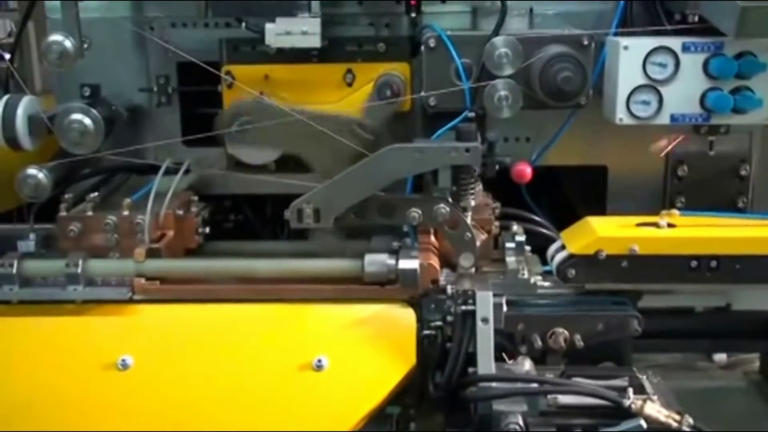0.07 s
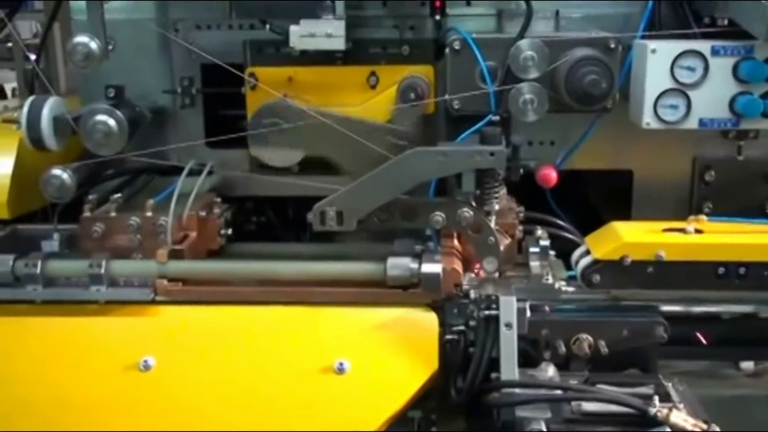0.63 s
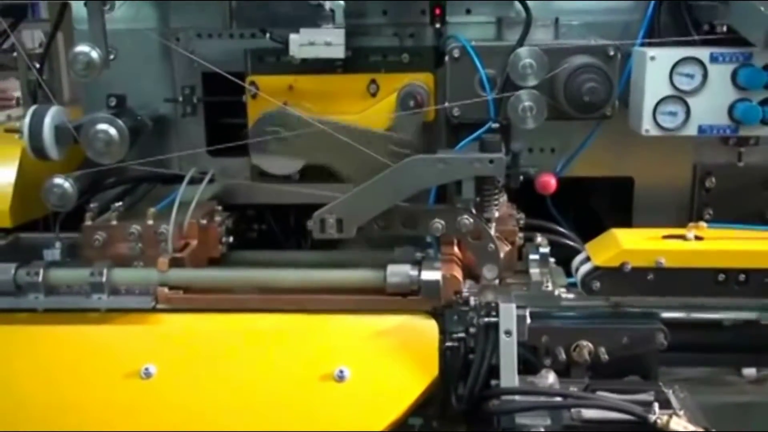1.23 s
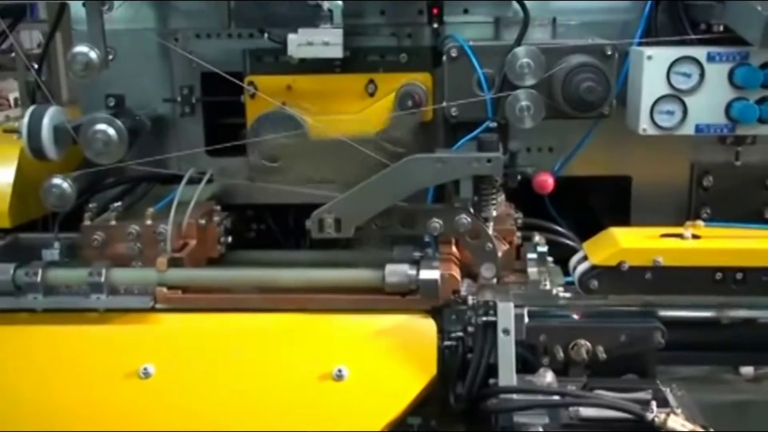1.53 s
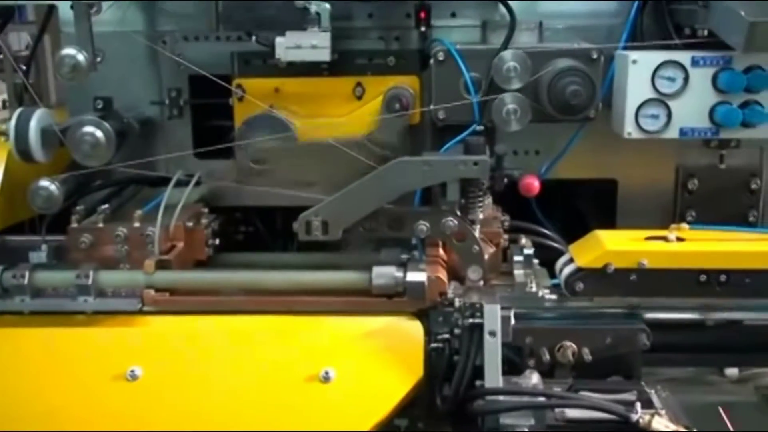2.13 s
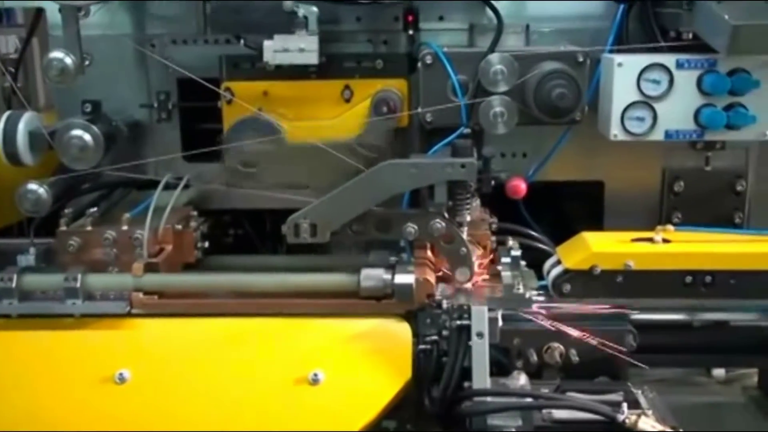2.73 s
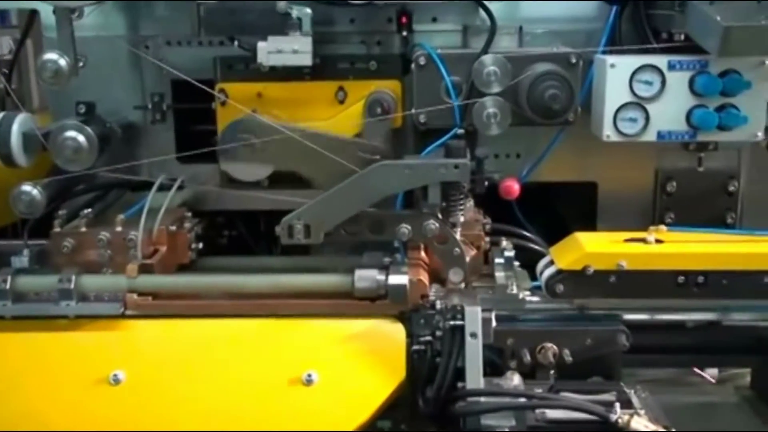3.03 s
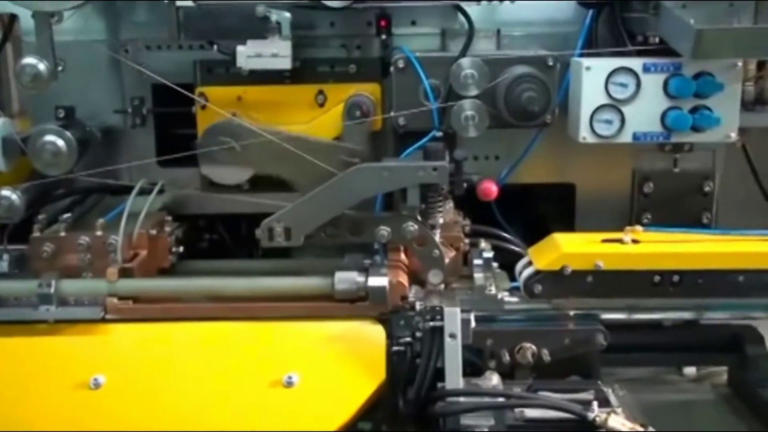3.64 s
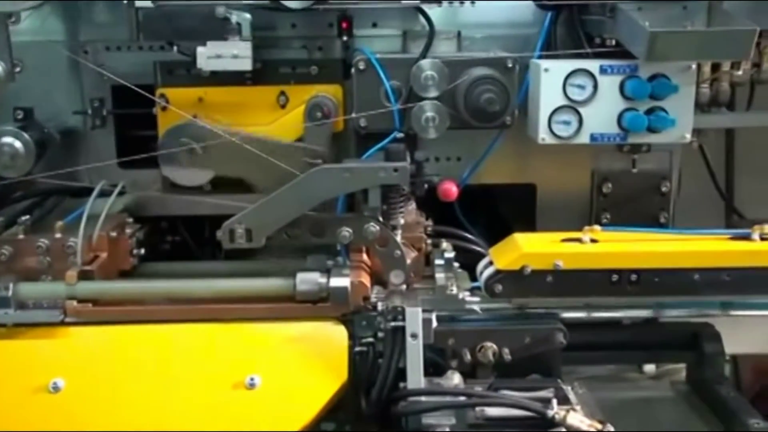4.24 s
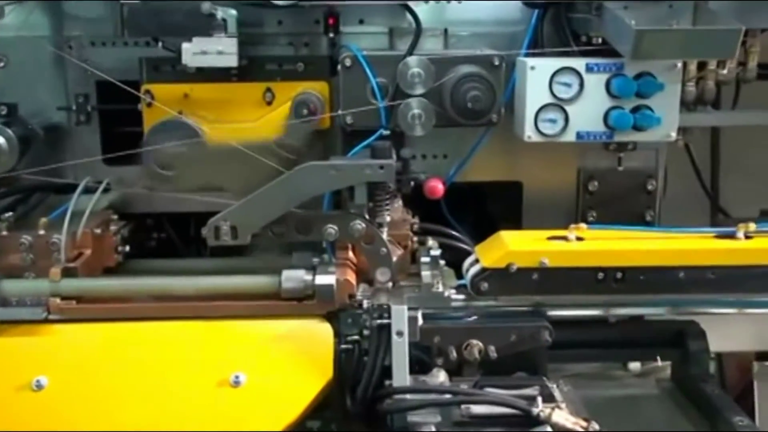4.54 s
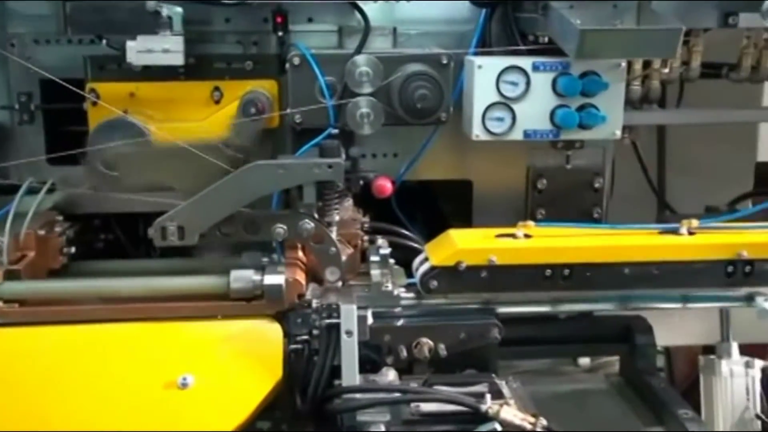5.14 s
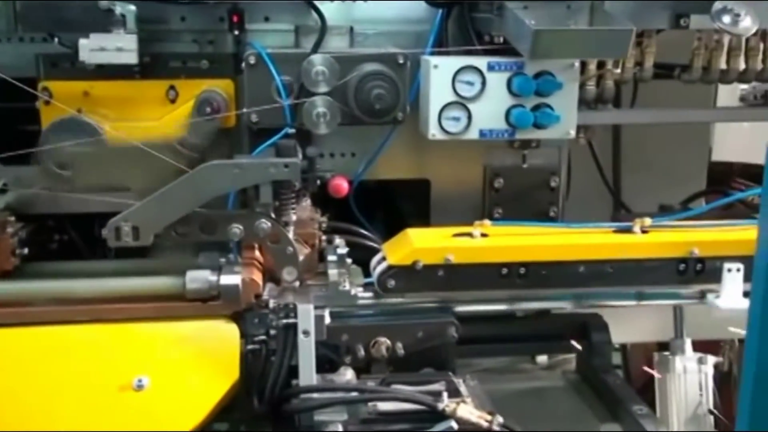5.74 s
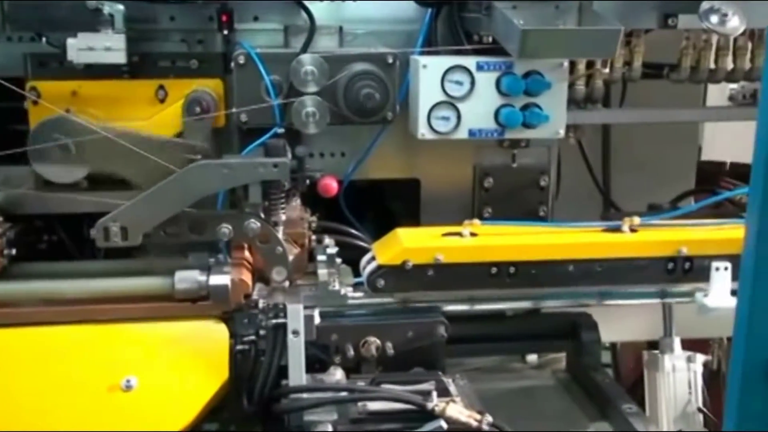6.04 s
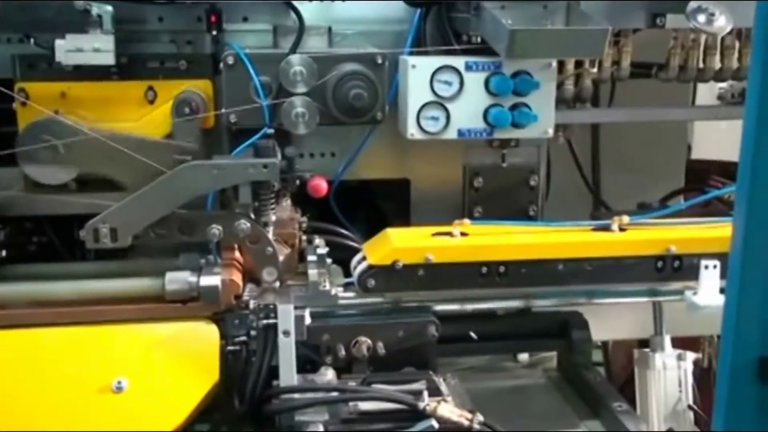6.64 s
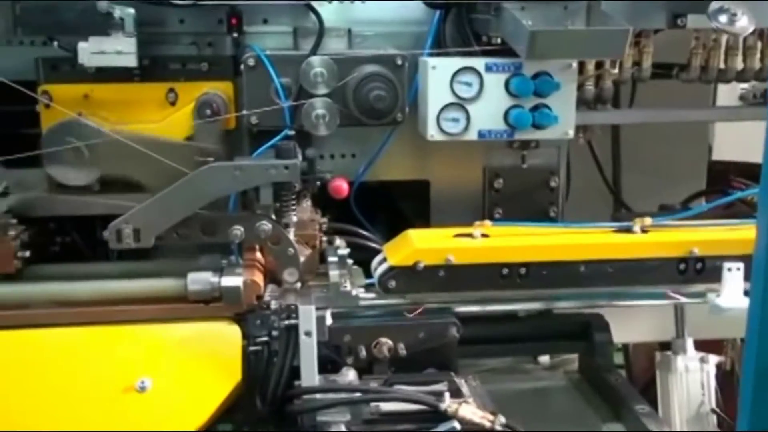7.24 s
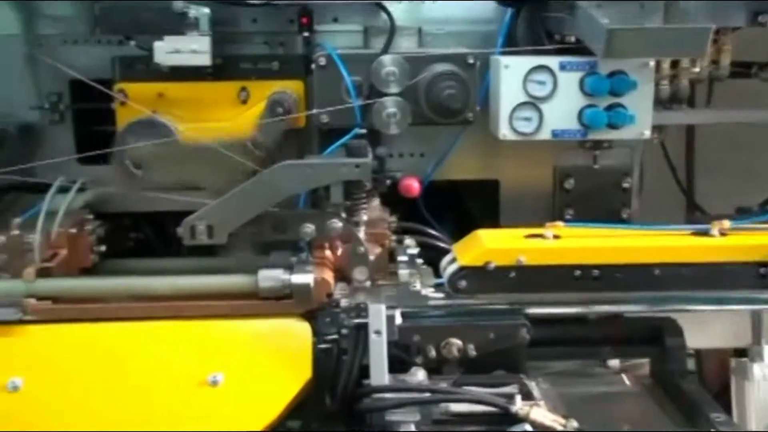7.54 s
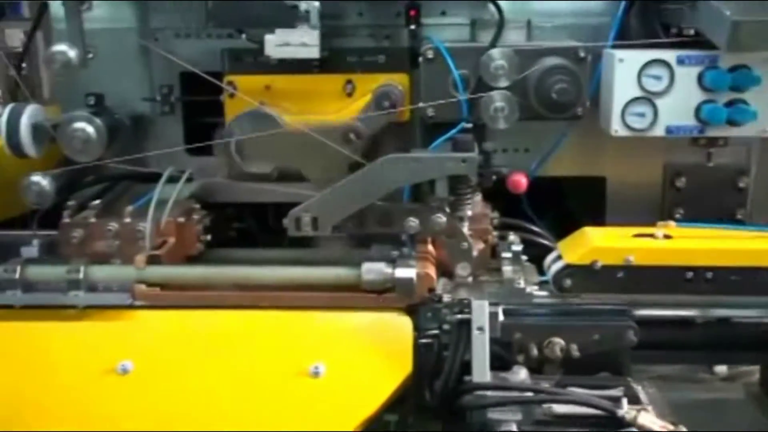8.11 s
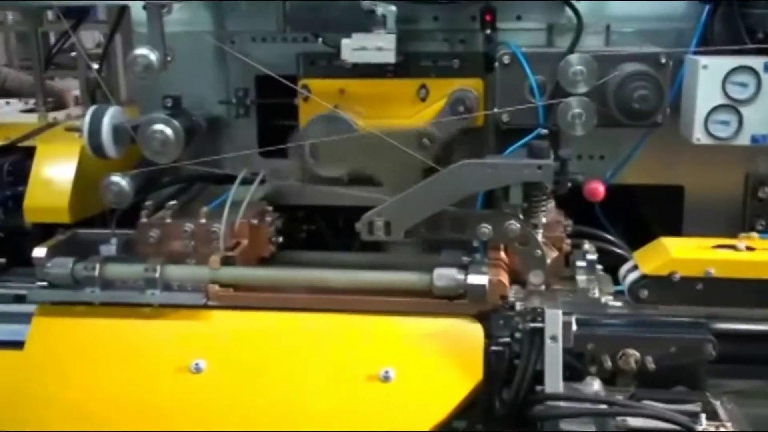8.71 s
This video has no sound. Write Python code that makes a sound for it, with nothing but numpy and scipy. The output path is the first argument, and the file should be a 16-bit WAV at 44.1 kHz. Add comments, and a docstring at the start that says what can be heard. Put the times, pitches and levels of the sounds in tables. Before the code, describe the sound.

Dense, rapid metallic clatter and a strong hiss of compressed air come from a machine welding tin cans. Thin sheets scrape along guides, cans clink, and the steel frame drones and whines above a humming motor and low factory wash. After a split-second dip early on, the nearby microphone moves slowly along the machine and back, passing a throbbing whirr. Everything leans right and cuts off abruptly after about eight seconds.

```python
"""A machine that welds tin can bodies runs flat out, heard while drifting along it in a factory hall.
Its feed repeats a pattern of blows 13 times a second, so the steel frame drones on multiples of that
rate. Flat tin sheets (blanks) rattle and scrape along the guides, cans ring, compressed air hisses,
the outlet whirrs and a motor hums. The sound leans to the right, dips once and later stops dead."""
import sys
import numpy as np
from scipy import signal
from scipy.fft import rfft, irfft, next_fast_len
from scipy.io import wavfile
from scipy.ndimage import uniform_filter1d

SR = 44100
rng = np.random.default_rng(int(sys.argv[2]) if len(sys.argv) > 2 else 0)


def unload_wav(signal):
    """Save mono or channel-first audio to the path in sys.argv[1] as 16-bit WAV at rate SR, clipped to [-1, 1]."""
    wavfile.write(
        sys.argv[1],
        SR,
        np.round(np.clip(np.atleast_2d(signal).T, -1, 1) * 32767).astype(np.int16),
    )


N = 391166
TIME = np.arange(N) / SR
CYCLE_HZ = 13.334  # how often the feed repeats its pattern
CYCLES = np.arange(int(N / SR * CYCLE_HZ) + 1)
SIDES = np.array([[1], [-1]]) / 2  # half of a difference goes to the left, half to the right


# Moments when a blank runs roughly: time_s, extra_clatter_db, extra_scrape_db
SNAG_MOMENTS = [(.08, 1.5, -1), (.55, 2.5, -5), (2.48, 1.5, 1), (3.0, 2, -1.5), (3.38, .5, 3), (3.56, 1, 3),
                (3.70, 0, 2), (3.80, 2, 1), (4.7, 1.5, 1.5), (4.83, 0, 3), (7.41, 0, 3.8),
                (7.64, 1.2, -1.5), (7.91, .6, 2)]
# Tone colour of rattling tin: pitch_hz, relative_db
RATTLE_COLOUR = [(30, -44), (180, -15), (330, -5.5), (560, -3), (700, -1.6), (950, 0.5), (1090, -1.5),
                 (1300, -2.5), (1800, 0.9), (2100, -4.5), (3400, -2.5), (5000, -5.5), (9000, -13.5),
                 (15000, -33)]
# Tone colour of tin scraping along the guides: pitch_hz, relative_db
SCRAPE_COLOUR = [(200, -49), (1900, -21), (2150, -13), (2310, -2.5), (2530, -3.5), (2800, -5), (3200, -2.5),
                 (3290, -12), (3680, -10), (3790, 0), (3920, -19), (6000, -30.5)]

def blanks(place, head_place=.35, fall_db=.84):
    """The feed strikes and the tin rattles, scrapes and rings, loudest beside the welding head."""
    clatter_db = sum(db * swell(s, .056) for s, db, _ in SNAG_MOMENTS)
    scrape_db = sum(db * swell(s, .056) for s, _, db in SNAG_MOMENTS)
    rattle = undb(-26.5) * chatter(RATTLE_COLOUR, per_s=1700, scatter_db=2.5, ring_s=.06)
    scrape = undb(-33.5) * chatter(SCRAPE_COLOUR, per_s=1100, scatter_db=4.5, ring_s=.041)
    clatter = rattle + undb(-31) * feed()
    ringing = scrape + undb(-36.7) * pings() + cans()
    sound = undb(clatter_db) * clatter + undb(scrape_db) * ringing
    return sound * undb(-fall_db * abs(place - head_place))


def chatter(colour, per_s, scatter_db, ring_s):
    """Blanks touch the guides in a dense stream; every touch rings a different spot for a moment."""
    touches = rng.random(N) < per_s / SR
    energy = touches * undb(scatter_db * rng.standard_normal(N)) ** 2
    kept_per_sample = np.exp(-2 * np.log(1000) / (ring_s * SR))
    fading = signal.lfilter([1], [1, -kept_per_sample], energy)
    return stereo(rng.standard_normal((3, N)) * np.sqrt(fading), colour)


# The blows in one feed cycle: share_of_cycle, relative_db
FEED_BLOWS = [(.01, 0.5), (.13, -4.5), (.19, -3.5), (.29, 3), (.41, -1.5), (.47, -2), (0.579, -3),
              (0.639, -5.5), (.83, 1), (.95, 1.5)]
# Tone colour of the struck frame: pitch_hz, relative_db
FRAME_COLOUR = [(30, -45.5), (120, -19), (190, -15), (270, -8), (520, -2), (800, -4.5), (950, -2),
                (1090, -6.5), (1250, 3), (1750, -1), (2100, -6), (4000, -13), (15000, -33.5)]

def feed(jitter_s=.00009, scatter_db=1.1, ring_s=.07):
    """The same parts are struck each cycle; tiny timing slips blur the high notes into noise."""
    out = 0
    for share, db in FEED_BLOWS:
        late, harder = rng.standard_normal((2, len(CYCLES)))
        clicks = strike((CYCLES + share) / CYCLE_HZ + jitter_s * late, db + scatter_db * harder)
        out = out + steel_ring(clicks, ring_s)
    return stereo(out, FRAME_COLOUR)


def steel_ring(clicks, ring_s, even_hz=40):
    """Clicks ring the countless notes of a steel part, which reach the listener along three paths."""
    t = TIME[:SR // 4]
    notes = rfft(rng.standard_normal((3, len(t))) * undb(-60 * t / ring_s))
    # a large part has notes everywhere, so no narrow range stands out
    notes /= np.sqrt(uniform_filter1d(np.abs(notes) ** 2, int(even_hz * t[-1])))
    return signal.oaconvolve(clicks[None], irfft(notes), axes=1)[:, :N]


# The notes a thin can body rings at: pitch_hz, level_db
CAN_NOTES = [(2306, -45), (2410, -50.5), (2525, -45.5), (2627, -45.5), (2657, -49), (2842, -48.5),
             (3006, -46), (3100, -48.5), (3184, -45.5), (3230, -44.5), (3788, -50), (4820, -48.5),
             (6420, -49), (11120, -50.5)]

def cans(jitter_s=.012, scatter_db=3.5, ring_s=.16):
    """Can bodies knock together each cycle; being alike, they ring the same notes in a changing mix."""
    t = TIME[:SR // 2]
    out = 0
    for hz, db in CAN_NOTES:
        late, harder = rng.standard_normal((2, len(CYCLES)))
        knocks = strike((CYCLES + rng.random()) / CYCLE_HZ + jitter_s * late, scatter_db * harder)
        shift = rng.choice([-1, 1]) * np.arccos(at_hz(EAR_LIKENESS, hz))
        note = undb(-60 * t / ring_s) * np.sin(2 * np.pi * hz * t + SIDES * shift)
        ringing = unit(signal.oaconvolve(knocks[None], note, axes=1)[:, :N])
        out = out + undb(db + SIDES * at_hz(EAR_BALANCE, hz)) * ringing
    return out


def pings(count=600, low_hz=1200, high_hz=3500, scatter_db=1.5, ring_s=.14):
    """Loose tin edges touch here and there; each touch rings briefly at a pitch of its own."""
    t = TIME[:SR // 4]
    out = np.zeros((2, N + len(t)))
    for when, pitch, lag in rng.random((count, 3)):
        hz = low_hz + pitch * (high_hz - low_hz)
        shift = 2 * (2 * lag - 1) * np.arccos(at_hz(EAR_LIKENESS, hz))
        db = scatter_db * rng.standard_normal() + SIDES * at_hz(EAR_BALANCE, hz)
        note = np.sin(2 * np.pi * hz * t + SIDES * shift)
        start = int(when * N)
        out[:, start:start + len(t)] += undb(db - 60 * t / ring_s) * note
    return unit(out[:, :N])


# Puffs of air in one feed cycle: share_of_cycle, rise_db
AIR_PUFFS = [(.05, 1.5), (.17, 2.5), (.35, 1), (.42, 2), (.56, 0.5), (.65, 3.5), (.77, 1), (.965, 4)]
# Tone colour of the hiss: pitch_hz, relative_db
AIR_COLOUR = [(100, -43.5), (2000, -2), (4000, -2), (6100, -0.5), (6450, 1), (6900, -.3), (8000, 0),
              (9000, -2.5), (10300, -1.5), (12000, -6), (14000, -11), (15400, -22)]
# How loud the hiss is: time_s, level_db
AIR_LEVEL = [(0, -22.5), (1.0, -23.5), (2.0, -24), (3.1, -23.5), (4.1, -23.5), (6.3, -24.5), (7.8, -23.5)]

def air(puff_s=.0064, flicker_db=.6):
    """Compressed air hisses, with a small sharp puff at each stroke of the cycle."""
    puffs_db = 0
    for share, db in AIR_PUFFS:
        since_s = (CYCLE_HZ * TIME - share) % 1 / CYCLE_HZ
        puffs_db = puffs_db + db * np.exp(-since_s / puff_s)
    hiss = rng.standard_normal((3, N)) * undb(puffs_db + flicker_db * wander(25))
    return undb(curve(AIR_LEVEL)) * stereo(hiss, AIR_COLOUR)


# The tones the frame sings: multiple_of_cycle_rate, relative_db
DRONE_TONES = [(7, -45), (8, -55), (12, -56), (18, -61), (19, -57), (22, -59.5), (30, -54), (32, -54),
               (35, -40.7), (36, -55.5), (37, -56), (38, -49), (39, -50), (42, -50.5), (43, -48.5),
               (44, -51), (46, -50.5), (47, -53), (48, -46.5), (50, -46.5), (54, -52), (55, -52), (57, -46),
               (81, -53), (84, -50), (87, -47.5), (88, -48), (90, -50), (91, -45.5), (92, -49), (93, -45.3),
               (95, -48), (96, -45.5), (97, -47.5), (99, -49.5), (100, -46.5), (103, -47.5), (104, -49),
               (106, -47), (108, -48.5), (110, -50), (112, -48), (118, -49), (126, -44.5), (132, -47),
               (135, -45.5), (152, -51)]

def drone(fade_db_per_khz=1.5):
    """The shaken frame sings; the higher a tone, the more it fades in and out among the echoes."""
    out = 0
    for multiple, db in DRONE_TONES:
        hz = multiple * CYCLE_HZ
        khz = hz / 1000
        out = out + tone(hz, db + fade_db_per_khz * khz * wander(1.635), waver_rad=.56 * khz)
    return out


# The frame's strong tones: multiple_of_cycle_rate, level_db, loudest_place, fall_db_per_machine_length
WHINE_TONES = [(41, -34.5, .5, 3.5), (60, -43.5, 0, 8.5), (63, -43.8, .55, 10), (64, -44, .65, 8),
               (70, -40.8, .8, 13), (71, -41, .9, 14), (72, -45.5, .8, 10), (73, -46, .5, 4),
               (74, -43, .55, 7), (76, -42, .45, 14), (77, -41, .45, 13)]

def whine(place, flutter_db_per_khz=2.5):
    """A few tones stand out of the drone, each loudest at its own spot; higher ones flutter more."""
    out = 0
    for multiple, db, spot, fall_db in WHINE_TONES:
        hz = multiple * CYCLE_HZ
        khz = hz / 1000
        level_db = db - fall_db * abs(place - spot) + flutter_db_per_khz * khz * wander(CYCLE_HZ)
        out = out + tone(hz, level_db, waver_rad=.55 * khz)
    return out


# Brief squeals of the frame: time_s, peak_db
SQUEAL_MOMENTS = [(.33, -42), (1.45, -38), (1.75, -38.5), (2.45, -37.5)]

def squeals(multiple=73, half_width_s=.11):
    """One tone of the frame sings out for a moment now and then."""
    loudness = sum(undb(db) * swell(s, half_width_s) for s, db in SQUEAL_MOMENTS)
    return loudness * tone(multiple * CYCLE_HZ, 0, waver_rad=.3)


# The tones of the motor: multiple_of_shaft_rate, relative_db, flutter_db
MOTOR_TONES = [(3, -53.5, 5), (4, -43.5, 1.6), (5, -42.5, 2.5), (6, -46.5, 2.5)]

def motor(shaft_hz=69.47):
    """The motor hums on multiples of its turning rate; some tones flutter more than others."""
    return sum(tone(multiple * shaft_hz, db + flutter_db * wander(7), waver_rad=.55)
               for multiple, db, flutter_db in MOTOR_TONES)


# Tone colour of the whirr: pitch_hz, relative_db
WHIRR_COLOUR = [(600, -50.5), (890, -22), (935, 1), (960, -1.5), (1000, -6), (1025, -0.5), (1065, -21.5),
                (1500, -49.5)]

def whirr(place, loudest_place=.52, fall_db=11.5, pulse_db=2, flutter_db=3):
    """The outlet rings roughly and throbs with the feed, heard best halfway along the machine."""
    throb_db = pulse_db * np.cos(2 * np.pi * CYCLE_HZ * TIME) + flutter_db * wander(CYCLE_HZ)
    noise = stereo(rng.standard_normal((3, N)), WHIRR_COLOUR)
    return noise * undb(throb_db - fall_db * abs(place - loudest_place))


# How loud the low buzz is: time_s, level_db
BUZZ_LEVEL = [(0.1, -44), (.6, -49), (.9, -62), (1.4, -46), (2.2, -51), (2.7, -60), (3.8, -52), (4.7, -56),
              (5.4, -52), (6.2, -62), (6.6, -47.5), (7.6, -51), (7.95, -47)]

def buzz(pitch_hz=120):
    """A clean low buzz comes and goes slowly."""
    return tone(pitch_hz, curve(BUZZ_LEVEL), waver_rad=.2)


# Soft low bumps: time_s, peak_db, pitch_hz, half_width_s
LOW_BUMPS = [(.135, -49.5, 45, .028), (0.397, -53, 61.7, .08), (.79, -50, 50.1, .03), (2.04, -51, 28, .025),
             (2.79, -60, 58, .06), (3.52, -57.5, 55, .045), (5.67, -46, 54, .022),
             (5.672, -29, 190, 0.0036), (5.74, -52, 54, .04), (5.94, -49, 46, .025),
             (6.17, -50.5, 36, .025), (6.40, -49, 47, .025), (6.68, -58.5, 64, .07), (6.82, -48, 47, .025)]

def bumps():
    """Short swells of deep vibration, the same in both ears."""
    return sum(undb(db) * swell(s, half_width_s) * np.cos(2 * np.pi * hz * (TIME - s))
               for s, db, hz, half_width_s in LOW_BUMPS)


# Tone colour of the factory hall: pitch_hz, relative_db
HALL_COLOUR = [(15, -27.5), (40, -29.5), (65, -13.5), (88, 2.5), (120, 2.5), (140, -4.5), (220, 1),
               (400, -6), (1000, -1), (4000, -22.5)]

def hall(swell_db=3):
    """The rest of the factory blends into a low, uneven wash."""
    return stereo(rng.standard_normal((3, N)), HALL_COLOUR) * undb(swell_db * wander(14))


# How alike the two ears hear each pitch: pitch_hz, likeness_0_to_1
EAR_LIKENESS = [(40, .72), (93, .8), (125, .45), (160, .25), (230, .22), (290, .58), (480, .8), (640, .76),
                (1300, .84), (2200, .72), (3000, .71), (3400, .55), (6500, .62), (8600, .98), (11000, .98),
                (12500, .92), (15000, .95)]
# How far each pitch leans to one side: pitch_hz, left_minus_right_db
EAR_BALANCE = [(30, -1), (90, -5.5), (200, -6), (600, -5.3), (1300, -3.4), (2400, -3.3), (4400, -4.3),
               (7500, -4), (8600, -.5), (15000, -.7)]

def stereo(paths, colour):
    """Mix one direct and two scattered sounds into left and right, coloured and at a standard level."""
    size = next_fast_len(N)
    spectra = rfft(paths, size)
    hz = np.fft.rfftfreq(size, 1 / SR) + 1
    direct = at_hz(EAR_LIKENESS, hz)
    pair = np.sqrt(direct) * spectra[0] + np.sqrt(1 - direct) * spectra[1:]
    gain = undb(at_hz(colour, hz) + SIDES * at_hz(EAR_BALANCE, hz))
    pair = irfft(pair * gain, size)[:, :N]
    return pair / np.std(pair.mean(axis=0))


def tone(hz, db, waver_rad):
    """One wavering pure tone; echoes put it out of step between the ears."""
    phase = 2 * np.pi * (hz * TIME + rng.random()) + waver_rad * wander(3)
    shift = rng.choice([-1, 1]) * np.arccos(at_hz(EAR_LIKENESS, hz))
    return np.sqrt(2) * undb(db + SIDES * at_hz(EAR_BALANCE, hz)) * np.sin(phase + SIDES * shift)


def strike(times_s, db):
    """A click of the given level at each time."""
    return np.bincount(np.clip(times_s * SR, 0, N).astype(int), undb(db), N + 1)[:N]


def swell(time_s, half_width_s):
    """A bell-shaped rise and fall around one moment."""
    return np.exp(-((TIME - time_s) / half_width_s) ** 2)


def wander(rate_hz):
    """A smooth random drift, mostly between -1 and 1."""
    points = rng.standard_normal(int(N / SR * rate_hz) + 2)
    joined = np.interp(TIME * rate_hz, np.arange(len(points)), points)
    return uniform_filter1d(joined, int(SR / rate_hz / 2))


def curve(rows):
    """Join (time_s, value) points with straight lines."""
    return np.interp(TIME, *np.transpose(rows))


def at_hz(rows, hz):
    """Read between (pitch_hz, value) points, with every octave equally wide."""
    pitches, values = np.transpose(rows)
    return np.interp(np.log(hz), np.log(pitches), values)


def undb(db):
    """Turn decibels into a factor to multiply by."""
    return 10 ** (np.asarray(db) / 20)


def unit(x):
    """Scale a sound to an average power of one."""
    return x / np.sqrt(np.mean(x ** 2))


# Where the listener is, from the feed (0) to the outlet (1): time_s, place
LISTENER_PATH = [(0, .11), (1, 0), (2, .05), (3, .16), (4, .37), (5, .63), (5.5, .83), (6.5, 1), (7.1, .97),
                 (7.5, .66), (8, .22)]
# The level dips briefly: time_s, change_db
BRIEF_DIP = [(.66, 0.5), (.683, -28), (.745, -28), (.757, -14), (0.763, 1.2), (.82, 1.2), (.87, 0.67)]
# The sound stops dead: time_s, change_db
SUDDEN_STOP = [(8.059, -0.5), (8.062, -36), (8.09, -68), (8.2, -130)]

def scene():
    """Clatter, tones and hiss heard from a slowly moving place, over the wash of the hall."""
    place, dip_db = curve(LISTENER_PATH), curve(BRIEF_DIP)
    tones = undb(-1) * drone() + whine(place) + squeals() + undb(-2) * motor() + buzz()
    tin = blanks(place)
    glitter = undb(-37) * pings(count=700, low_hz=4300, high_hz=10690, scatter_db=2, ring_s=.09)
    factory = tin + glitter + tones + undb(-42) * whirr(place) + undb(-43) * hall()
    hiss = undb(.84 * dip_db) * air()  # the hiss dips a little less than the factory
    return (factory * undb(dip_db) + hiss + bumps()) * undb(curve(SUDDEN_STOP))


def record(dry, gain_db=1.55, top_hz=15400):
    """Round off the tallest peaks a little and cut the highest treble."""
    rounded = undb(gain_db) * np.tanh(dry)
    return signal.sosfilt(signal.ellip(10, .2, 80, top_hz, fs=SR, output="sos"), rounded)


dry = scene()
out = record(dry)
unload_wav(out)
```